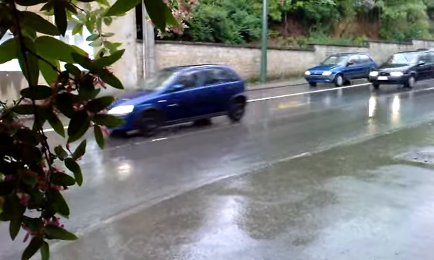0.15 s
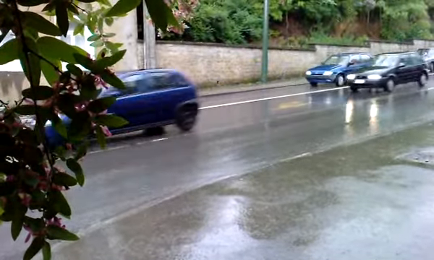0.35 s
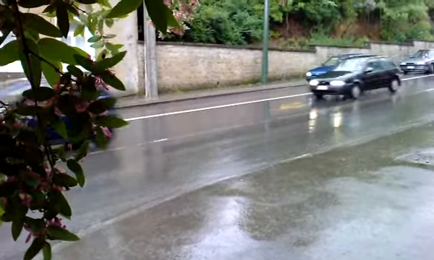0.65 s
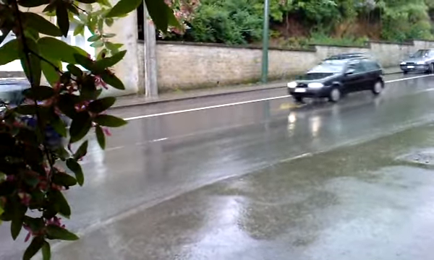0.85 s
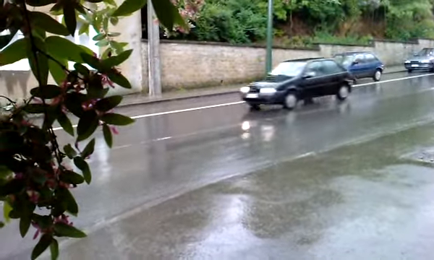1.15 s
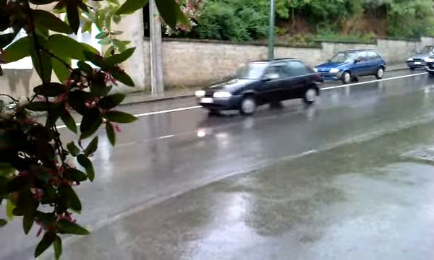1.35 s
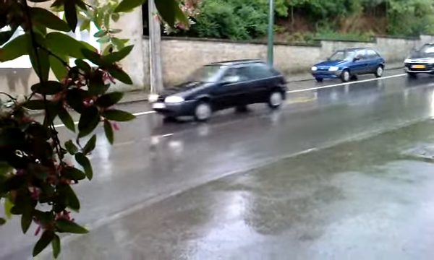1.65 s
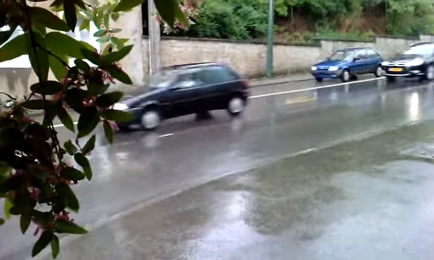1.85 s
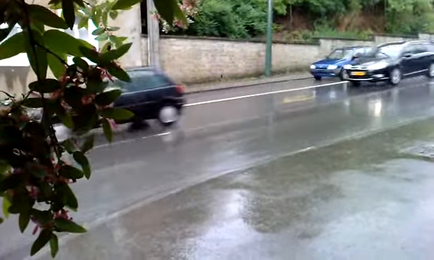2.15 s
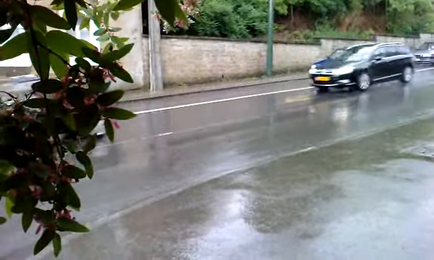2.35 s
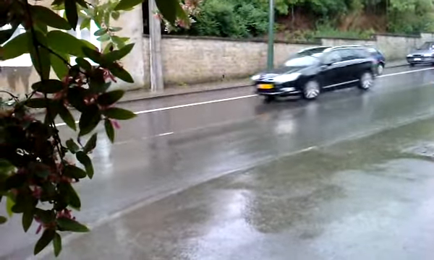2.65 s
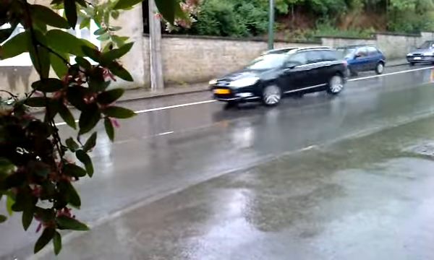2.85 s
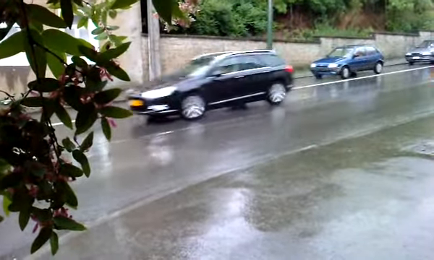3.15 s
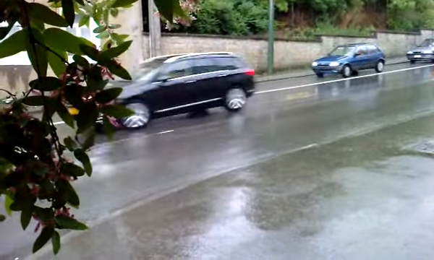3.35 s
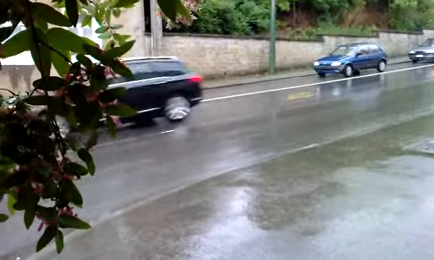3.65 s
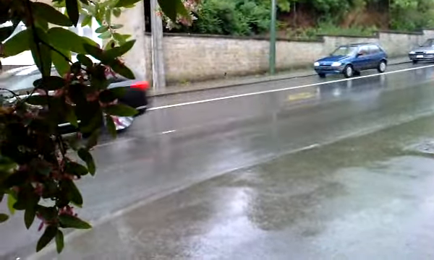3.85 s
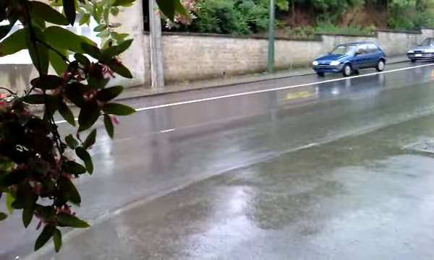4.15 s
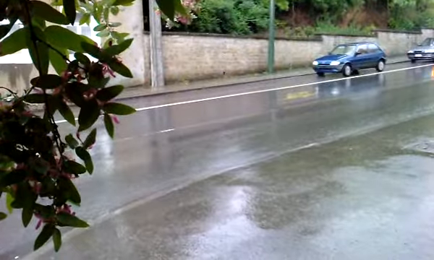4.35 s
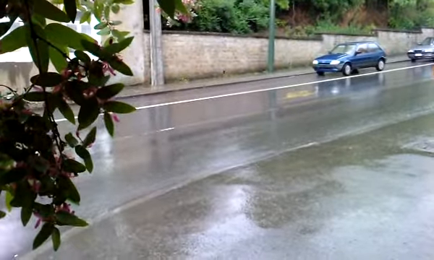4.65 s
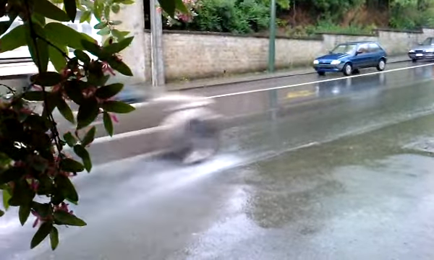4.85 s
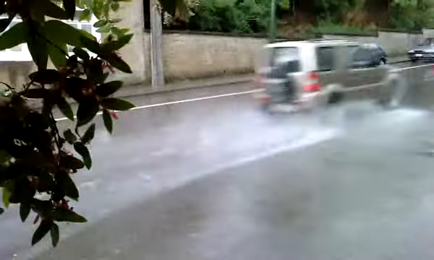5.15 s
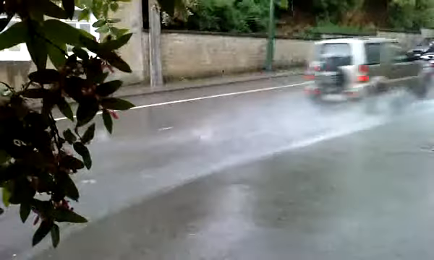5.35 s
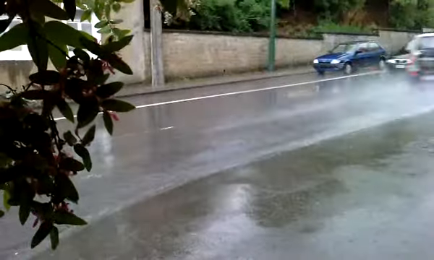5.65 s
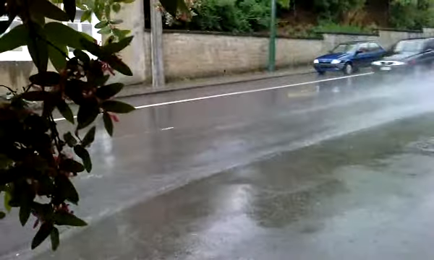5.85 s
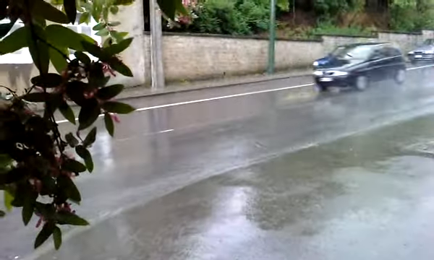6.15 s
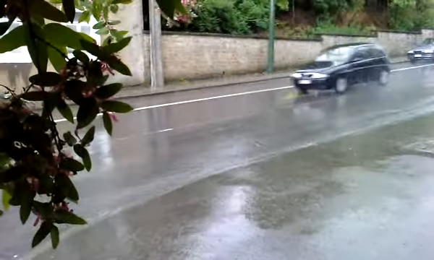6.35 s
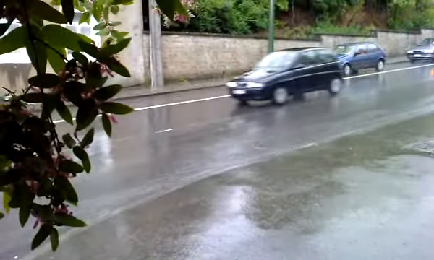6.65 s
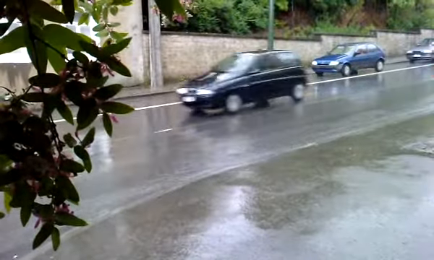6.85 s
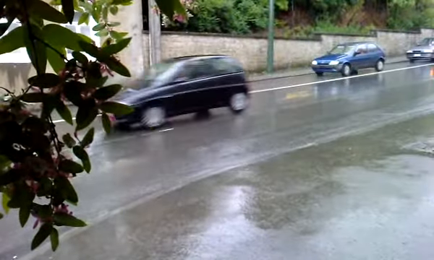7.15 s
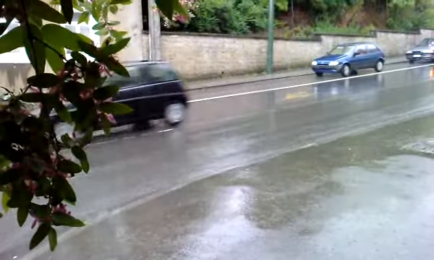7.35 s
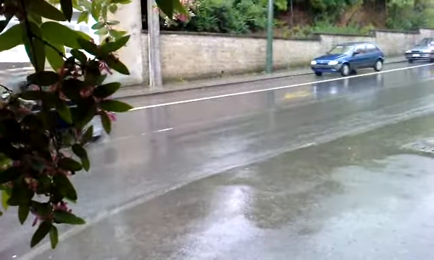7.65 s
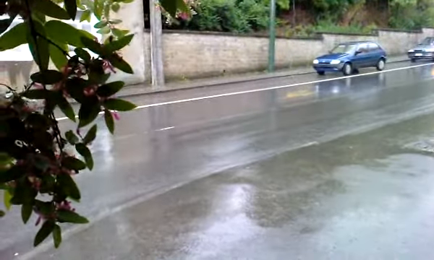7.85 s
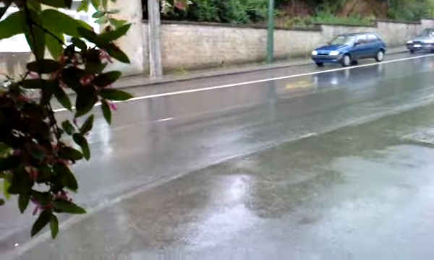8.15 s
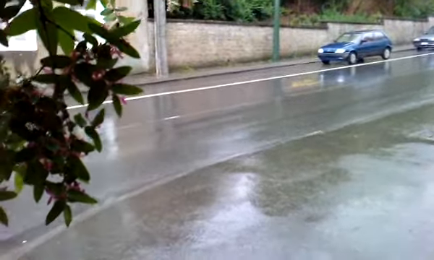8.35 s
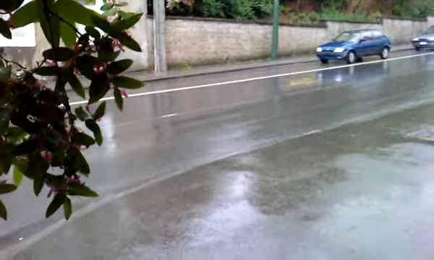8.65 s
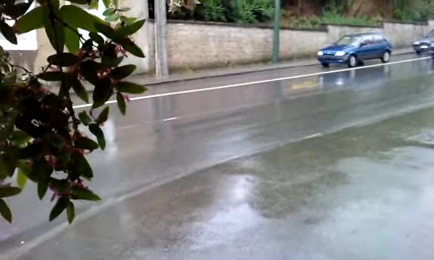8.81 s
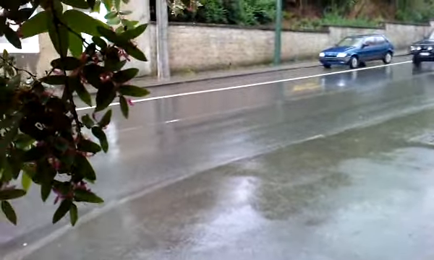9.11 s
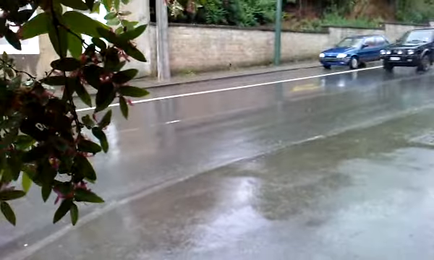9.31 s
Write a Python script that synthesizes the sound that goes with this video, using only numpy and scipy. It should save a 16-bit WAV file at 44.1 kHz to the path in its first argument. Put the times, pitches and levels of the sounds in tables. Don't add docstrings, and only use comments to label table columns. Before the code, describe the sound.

Outdoors beside a wet road, heard through a cheap camera microphone with gritty, bright midrange. Broad spray hiss and hollow tread roar swell, peak with sharp watery slaps, and ebb. Rain patter and faint engine hum remain in the middle, before a brief low drone and another close, splashing pass with a deep engine at the end.

```python
import sys
import numpy as np
from scipy import signal
from scipy.fft import rfft, irfft
from scipy.io import wavfile
from scipy.ndimage import uniform_filter1d

SR = 44100
rng = np.random.default_rng(int(sys.argv[2]) if len(sys.argv) > 2 else 0)


def wav_record(signal):
    frames = np.transpose(np.atleast_2d(signal))
    bounded = np.clip(frames, -1, 1)
    quanta = np.round(bounded * 32767).astype(np.int16)
    wavfile.write(sys.argv[1], SR, quanta)


def level_to_linear(level):
    exponent = np.asarray(level, float) / 20
    return 10 ** exponent


N = 418068

FRAME, HOP = 1024, 256
HZ = np.fft.rfftfreq(FRAME, 1 / SR)[:, None]
TIMES = np.arange(N // HOP + 5) * HOP / SR

# frequency in Hz, level in dB per Hz.
SPRAY = [(150, -23.5), (400, -11.5), (800, -9), (1500, -4.5), (2500, -1.5), (4000, -0.23), (7000, 0.5),
         (10000, 2.5)]


def spray_hiss(comb_db, near_db):
    dull_db = -0.35 * near_db * np.tanh(np.maximum(HZ - 4500, 0) / 1500)
    mist = hiss(colour_db(SPRAY) + dull_db + 0.55 * comb_db, patchy_db=0.79, flicker_db=0.71)
    drops = coloured(patter(per_s=3000, spread_db=1.5), SPRAY)
    return evened(mist + level_to_linear(-11) * drops)


def tread_roar(comb_db, since):
    horn_hz = 1383 * (1 - 0.086 * np.tanh(since / 0.7))
    octaves = np.log2((HZ + 1) / horn_hz)
    horn_db = np.where(octaves < 0, -6, -3) * octaves ** 2
    return hiss(horn_db + read(MIC, HZ) + comb_db, patchy_db=0.9, flicker_db=0.53)


# frequency in Hz, level in dB per Hz.
RUMBLE = [(110, -31), (170, -13), (250, -3.5), (400, 3), (600, 7.5), (900, 11.5), (1500, -24)]


def body_rumble(comb_db):
    return hiss(read(RUMBLE, HZ) + comb_db, patchy_db=2.3, flicker_db=1.6)


# nearest moment in seconds, distance over speed in seconds,
# spray level in dB, tread roar level in dB.
PASSES = [
    (.2, 2., -18.5, -32.5),
    (2.54, 0.52, -13.6, -16),
    (3.3, .32, -26, -21),
    (3.91, 0.55, -23, -32),
    (6.3, 0.66, -26, -36),
    (7.622, 0.55, -18.5, -40.5),
    (8.3, .39, -19, -25.5),
    (9.08, 0.54, -14.5, -21.5),
]
# nearest moment in seconds, distance over speed in seconds, spray level in dB,
# tread roar level in dB.
PUDDLES = [
    (1.14, .2, -19.5, -35),
    (1.839, 0.22, -20, -27),
    (2.22, 0.046, -20.5, -28.5),
    (2.8, 0.043, -24.5, -21),
    (3.86, 0.033, -28, -36),
    (8.602, .12, -16.5, -27),
    (8.82, 0.11, -20.5, -30.5),
    (9.21, 0.065, -22.5, -30),
]


def traffic(t, column, fall):
    rows = np.vstack([PASSES, PUDDLES])[:, :, None]
    far = 1 + ((t - rows[:, 0]) / rows[:, 1]) ** 2
    power = level_to_linear(rows[:, column]) ** 2 * far ** -fall
    return 10 * np.log10(power.sum(0))


# moment abreast in seconds, extra path over the wet road in ms,
# body boom level in dB.
ALONGSIDE = [
    (2.75, 3.6, -27.5),
    (8.75, 1.4, -40.5),
]


def nearest(t):
    rows = np.array(ALONGSIDE)
    row = rows[np.argmin(abs(t - rows[:, :1]), axis=0)].T
    return row, t - row[0]


def road_comb_db(path_ms, since):
    stretch_s = np.where(since < 0, 0.55, 1.1)
    lag_s = path_ms / np.hypot(1, since / stretch_s) / 1000
    echo = 0.55 * np.exp(-HZ / 1000)
    return 20 * np.log10(abs(1 + echo * np.exp(2j * np.pi * HZ * lag_s)))


# start in seconds, length in seconds, first pitch in Hz, last pitch in Hz,
# lift in dB.
GLIDES = [
    (0.954, 1.6, 2250, 1485, 5),
    (1.995, 0.39, 2840, 2740, 2.5),
    (2.107, 0.82, 1093, 625, 4.5),
    (2.848, 1.0, 1010, 1626, 4.5),
    (3.695, 0.73, 760, 1350, 6),
    (7.748, .8, 2000, 1600, 5.5),
    (8.4, .65, 820, 720, 4),
    (8.748, 0.63, 3180, 3350, 4),
]


def glide_db():
    lift = 0
    for start, length, from_hz, to_hz, lift_db in GLIDES:
        done = np.clip((TIMES - start) / length, 0, 1)
        pitch_hz = from_hz + (to_hz - from_hz) * done
        off = (HZ - pitch_hz) / 160
        arch = np.sqrt(abs(np.sin(np.pi * done)))
        lift = lift + lift_db * arch * np.exp(-off ** 2 / 2)
    return lift


def cars(t):
    (_, path_ms, boom_db), since = nearest(TIMES)
    comb_db = road_comb_db(path_ms, since) + glide_db()
    spray_db = traffic(TIMES, column=2, fall=1.416)
    roar_db = traffic(TIMES, column=3, fall=1.7)
    near_db = np.maximum(roar_db - spray_db + 17, 0)
    boom = level_to_linear(boom_db) / np.hypot(1, since / 0.12)
    body = np.sqrt(level_to_linear(roar_db - 14.5) ** 2 + level_to_linear(-48) ** 2 + boom ** 2)
    mix = np.interp(t, TIMES, level_to_linear(spray_db)) * spray_hiss(comb_db, near_db)
    mix = mix + np.interp(t, TIMES, level_to_linear(roar_db)) * tread_roar(comb_db, since)
    return mix + np.interp(t, TIMES, body) * body_rumble(comb_db)


# moment in seconds, sharpness in dB (every slap plays alike).
SLAPS = [(2.13, -44), (2.162, -45), (2.2029, -40), (2.2415, -46), (2.263, -49), (2.284, -39), (2.3424, -40),
         (2.4099, -42), (2.5692, -40), (2.6127, -44), (2.651, -36), (2.7352, -45), (2.775, -39),
         (2.806, -43), (2.8435, -40), (8.3843, -52), (8.5719, -51), (8.758, -41), (8.8227, -42),
         (8.8493, -43), (8.867, -39), (8.9156, -40), (9.028, -35), (9.197, -43)]


def slaps():
    lift_db = np.zeros(N)
    lift_db[np.round(np.array(SLAPS)[:, 0] * SR).astype(int)] = 4.5
    return level_to_linear(signal.oaconvolve(lift_db, np.hanning(round(2 * 0.0015 * SR)), "same"))


def drone(t):
    start_s = 7.2
    hz = 503 - 25 * np.clip(t - start_s, 0, 1)
    tone = resonate(resonate(rng.standard_normal(N), hz, width=55), hz, width=55)
    return level_to_linear(-42.5) * swell(t, start_s, rise=0.14, hold=0.6, fall=0.16) * evened(tone)


# frequency in Hz, level in dB rms.
IDLE = [
    (85.3, -60),
    (128.3, -56),
    (171, -63),
    (256.2, -56),
    (271, -58),
]


def idling(t):
    waver = 1.6 * evened(uniform_filter1d(rng.standard_normal(N), size=9000))
    lines = sum(level_to_linear(db + 4) * np.sin(2 * np.pi * hz * t + waver * hz / 256) for hz, db in IDLE)
    return lines * (level_to_linear(-6) + 0.37 * swell(t, 3.0, rise=0.44, hold=3.6, fall=0.29))


# frequency in Hz, level in dB per Hz.
LOW = [(15, -4), (40, -5), (70, -4.5), (130, 6), (180, 11.5), (260, -9.5)]
# start in seconds, hold in seconds, bass level in dB.
LORRIES = [
    (3.192, 0.39, -47.5),
    (9.03, 0.29, -40.5),
]


def traffic_bass(t):
    level = level_to_linear(-52)
    for start, hold, db in LORRIES:
        level = level + level_to_linear(db) * swell(t, start, rise=0.076, hold=hold, fall=0.11)
    return level * hiss(read(LOW, HZ), patchy_db=1.7, flicker_db=0.56)


# frequency in Hz, level in dB per Hz.
RAIN = [(100, -24.5), (250, -3), (420, -7.5), (700, 1), (1100, -7.5), (2500, -5), (4000, 0), (7000, 1.5),
        (10000, -0.5)]


def rain():
    wash = hiss(colour_db(RAIN), patchy_db=0.9, flicker_db=0.2)
    ticks = coloured(patter(per_s=2500, spread_db=0.5), RAIN)
    return level_to_linear(-30) * wash + level_to_linear(-43.5) * ticks


def patter(per_s, spread_db):
    size = level_to_linear(spread_db * np.minimum(rng.exponential(1, N), 4)) * rng.choice([-1., 1.], N)
    return size * (rng.random(N) < per_s / SR)


def drift(bins, frames):
    field = rng.standard_normal((len(HZ), len(TIMES)))
    return evened(uniform_filter1d(uniform_filter1d(field, bins, 0), frames, 1))


def hiss(shape_db, patchy_db, flicker_db):
    z = rng.standard_normal((len(HZ), len(TIMES), 2)) @ [1, 1j]
    gain = level_to_linear(shape_db) * np.ones(z.shape)
    gain = gain / np.sqrt((gain ** 2).mean(0))
    gain = gain * level_to_linear(patchy_db * drift(10, 16) + flicker_db * drift(150, 2))
    return evened(signal.istft(z * gain, nperseg=FRAME, noverlap=FRAME - HOP)[1][:N])


def resonate(x, hz, width):
    turn = np.exp(2j * np.pi * np.cumsum(hz * np.ones(len(x))) / SR)
    r = np.exp(-np.pi * width / SR)
    return 2 * (turn * signal.lfilter([1 - r], [1, -r], x / turn)).real


def swell(t, start, rise, hold, fall):
    return np.interp(t, start + np.cumsum([0, rise, hold, fall]), [0, 1, 1, 0])


def evened(x):
    return x / np.sqrt(np.mean(np.abs(x) ** 2) + 1e-20)


def read(points, hz):
    f, value = np.transpose(points)
    return np.interp(np.log(hz + 1), np.log(f + 1), value)


# frequency in Hz, gain in dB.
MIC = [(20, -4), (2000, 0.02), (3300, 3), (4150, 5.5), (4550, 2.5), (4950, -2.5), (5700, -2.5),
       (6600, -7.5), (8500, -16), (9300, -21.5), (10000, -30), (10150, -30), (10400, -61)]


def colour_db(points, hz=HZ):
    return read(points, hz) + read(MIC, hz)


def coloured(x, points):
    return evened(irfft(rfft(x) * level_to_linear(colour_db(points, np.fft.rfftfreq(N, 1 / SR))), N))


def scene():
    t = np.arange(N) / SR
    engines = drone(t) + idling(t) + traffic_bass(t)
    return (slaps() * cars(t) + engines + rain())[None]


# frequency in Hz, rounding step in dB against the rms of the frame.
STEP = [(20, -11), (170, -8), (300, -11), (1000, -13), (4000, -11), (8000, -15), (8800, -11), (11000, -13)]


def starved(x, size=512):
    n, k = np.arange(2 * size), np.arange(size // 2)
    basis = np.cos(np.pi / size * np.outer(n + 0.5 + size / 2, k + 0.5)) * np.sqrt(2 / size)
    basis = basis * np.sin(np.pi * (n + 0.5) / (2 * size))[:, None]
    halves = np.pad(x, (size, 2 * size - N % size)).reshape(-1, size)
    lines = np.hstack([halves[:-1], halves[1:]]) @ basis
    whole = np.sqrt(uniform_filter1d((lines ** 2).mean(1), size=3))[:, None]
    wander_db = 3 * evened(uniform_filter1d(rng.standard_normal(whole.shape), size=3, axis=0))
    step = whole * level_to_linear(read(STEP, (k + 0.5) * SR / (2 * size)) + wander_db)
    lines = step * np.sign(lines) * np.floor(abs(lines) / step + 0.4)
    frames = lines @ basis.T
    return (frames[:-1, size:] + frames[1:, :size]).ravel()[:N]


def low_pass(x):
    return signal.sosfilt(signal.butter(12, 15830, fs=SR, output="sos"), x)


def record(dry):
    rounded = starved(np.clip(dry[0], -0.7, 0.7))
    highpass_off = signal.ellip(10, 0.5, 70, 12150, fs=SR, output="sos")
    mirror = signal.sosfilt(highpass_off, rounded * (-1.) ** np.arange(N))
    played = np.clip(rounded + level_to_linear(-22) * mirror, -0.715, 0.715)
    return low_pass(played[None])


dry = scene()
out = record(dry)
wav_record(out)
```